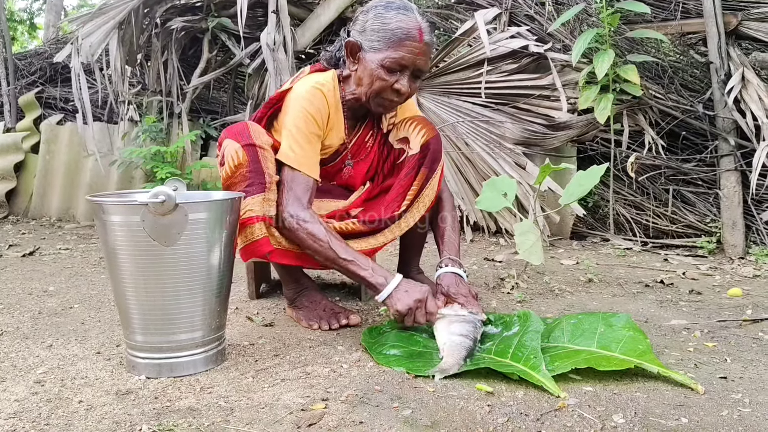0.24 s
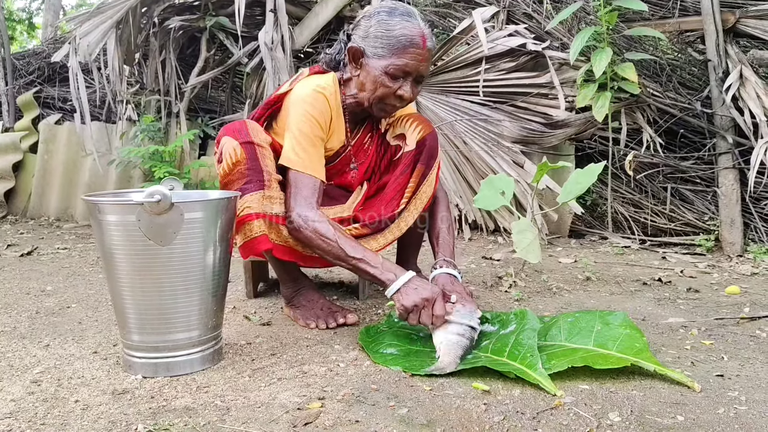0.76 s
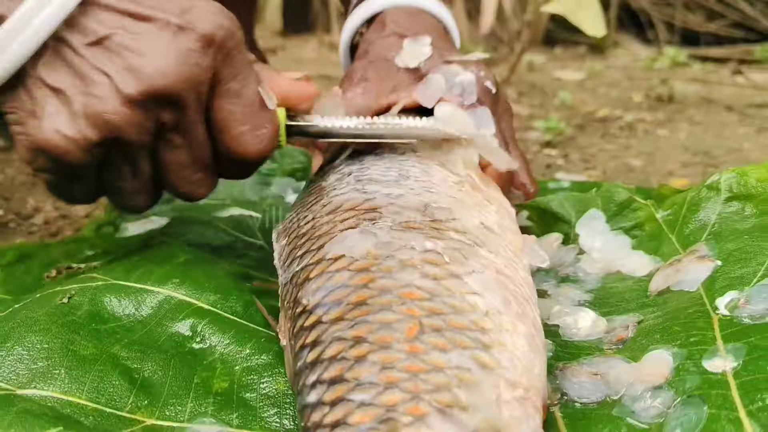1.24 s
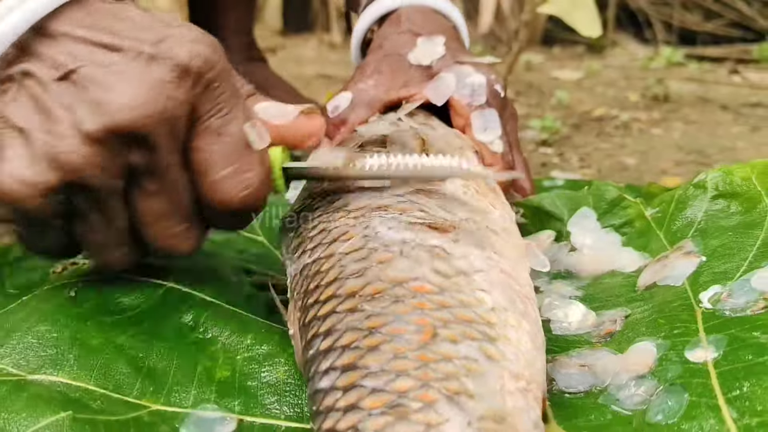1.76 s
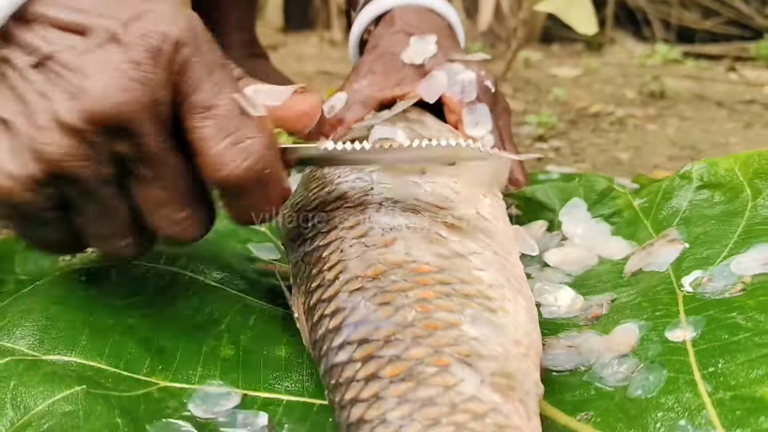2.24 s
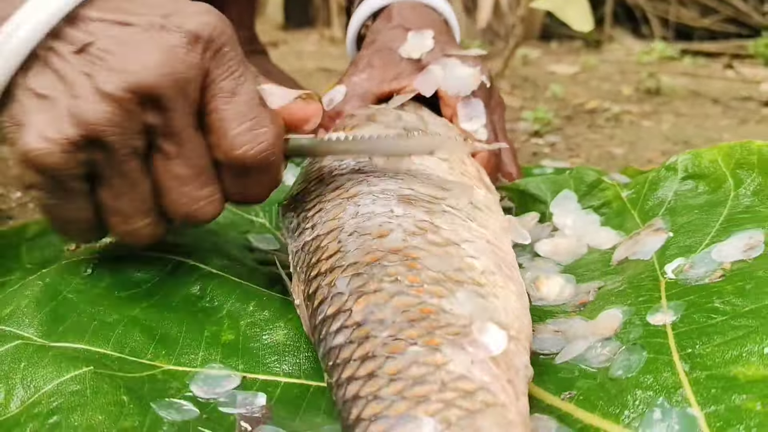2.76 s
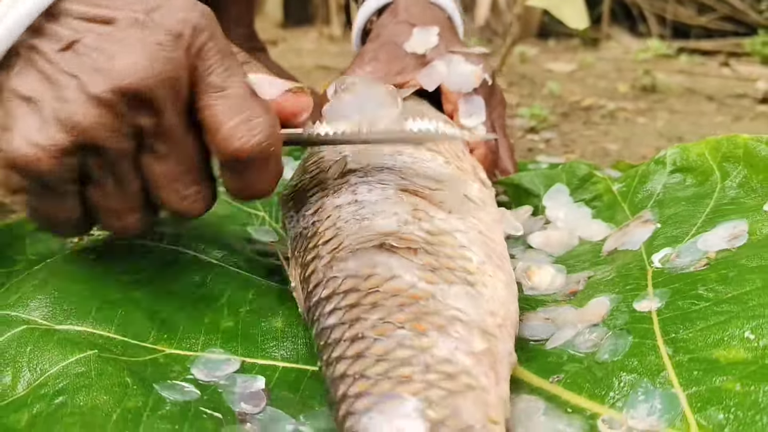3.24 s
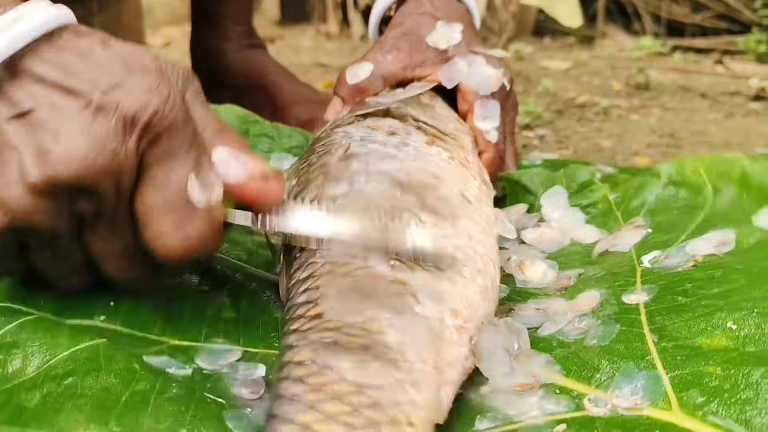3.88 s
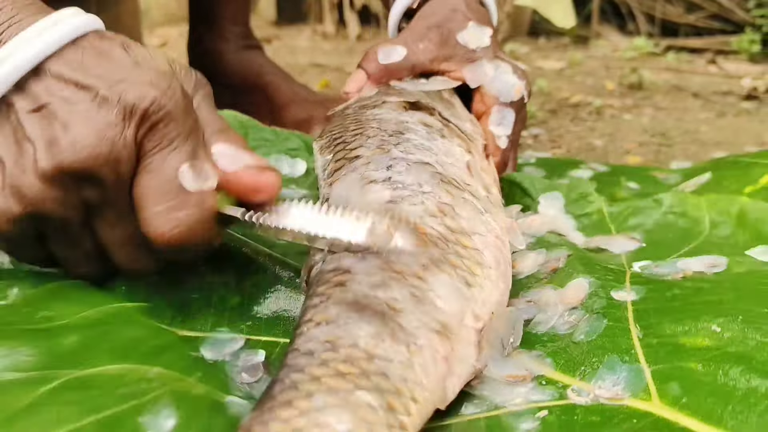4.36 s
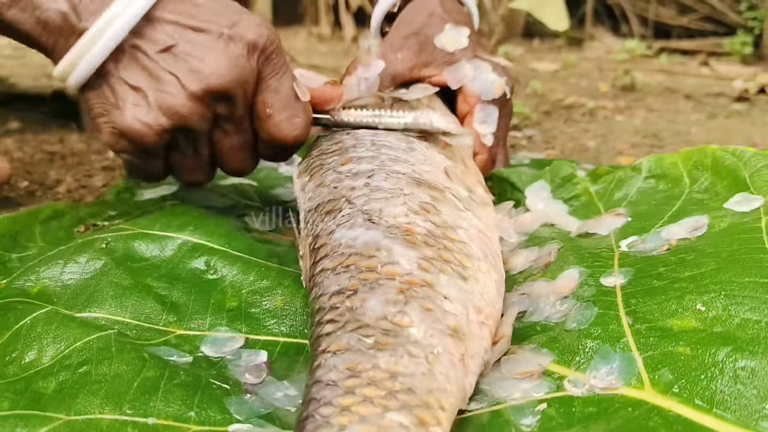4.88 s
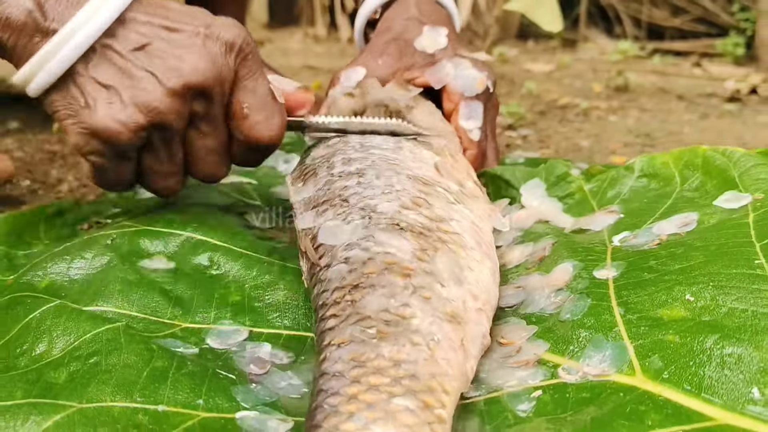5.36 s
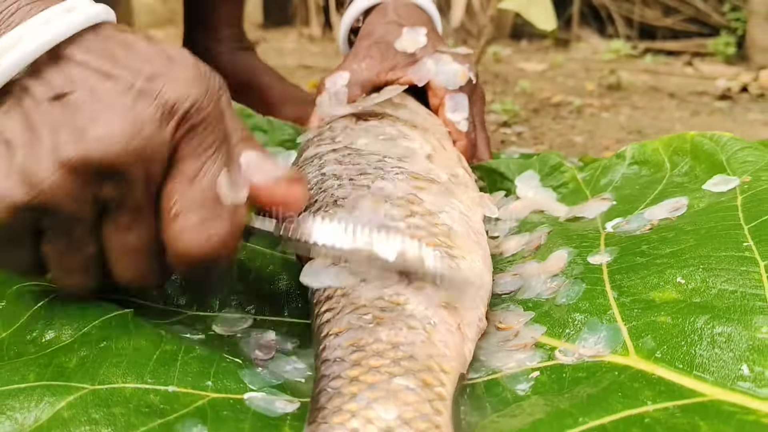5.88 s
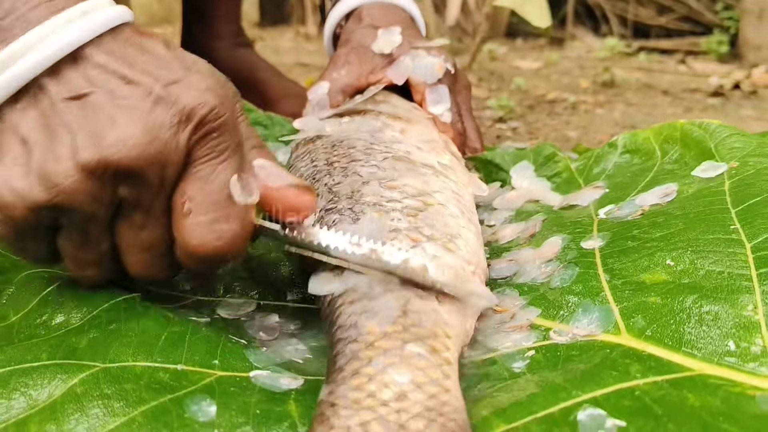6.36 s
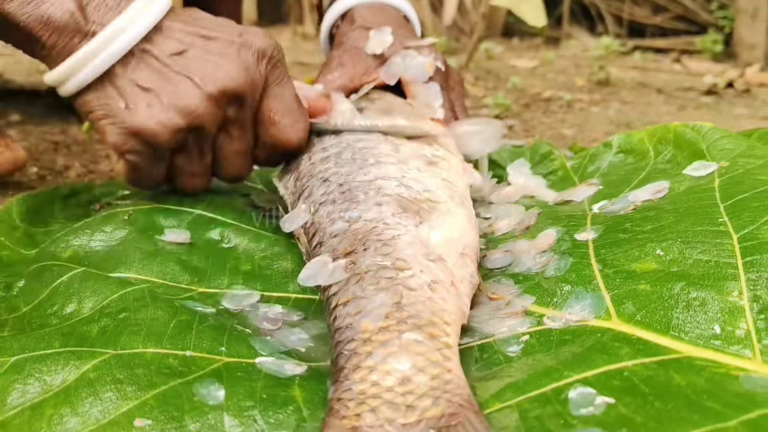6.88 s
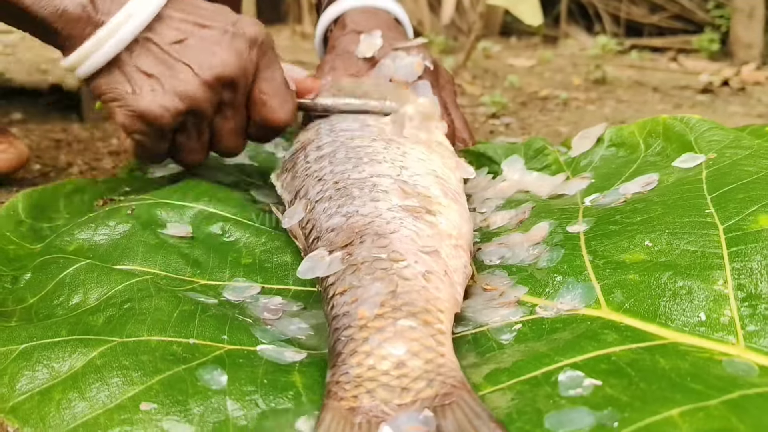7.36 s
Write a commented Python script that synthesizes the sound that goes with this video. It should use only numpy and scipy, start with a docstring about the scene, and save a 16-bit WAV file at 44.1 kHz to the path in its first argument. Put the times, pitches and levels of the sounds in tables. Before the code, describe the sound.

A serrated blade scrapes scales off a raw fish in quick raspy strokes, softer at first, then loud, crisp and close after a brief dropout.

```python
"""A yard: a serrated knife scrapes the scales off a raw fish on big leaves, first a few steps away, then,
after a cut with a short silence, close by. Strokes drive five bands of noise under many small catches of the teeth;
scales snap loose as sharp bursts, and dull taps are clusters of damped rings. A far hen calls faintly as a wavering
tone over steady coloured yard noise. Two microphone ports colour the scraping differently; the left hears it later.
"""
import sys
import numpy as np
from scipy import signal
from scipy.fft import rfft, irfft, next_fast_len
from scipy.io import wavfile
from scipy.ndimage import uniform_filter1d, map_coordinates

SR = 44100
rng = np.random.default_rng(int(sys.argv[2]) if len(sys.argv) > 2 else 0)


def digitize_waveform(pressure):
    """Quantize a signal to 16-bit integers and store it at the path in sys.argv[1].

    Rows of a 2-D input are taken as channels; values are limited to [-1, 1].
    """
    field = np.atleast_2d(pressure).T
    bounded = np.clip(field, -1, 1)
    quanta = np.round(bounded * 32767).astype(np.int16)
    wavfile.write(sys.argv[1], SR, quanta)


N = 336483

# the sound drops out briefly at the cut from the distant scraping to the close one
SILENCE_START_S, SILENCE_END_S = 1.322, 1.411


def amp(db):
    """dB to gain."""
    return 10 ** (np.asarray(db) / 20)


def along(points, hz):
    """Reads the columns of (Hz, value, ..) rows along a log frequency axis."""
    f, *cols = np.transpose(points)
    return np.array([np.interp(np.log(hz + 1), np.log(f + 1), c) for c in cols])


def curves(rows):
    """One value per sample for each column after the time."""
    s, *cols = np.transpose(rows)
    return [np.interp(np.arange(N) / SR, s, c) for c in cols]


def wobble(rate):
    """A smooth random curve, rate knots a second."""
    knots = rng.standard_normal(int(N * rate / SR) + 4)
    return map_coordinates(knots, [np.arange(N) * rate / SR])


def filtered(x, response):
    """Filters x by a response given as a function of frequency."""
    m = next_fast_len(N + 8192)
    hz = np.fft.rfftfreq(m, 1 / SR)
    return irfft(rfft(x, m) * response(hz), m)[..., :N]


def causal(gain):
    """Minimum-phase response with the given gains, made by folding the cepstrum."""
    cepstrum = irfft(np.log(gain + 1e-6))
    half = cepstrum.shape[-1] // 2
    cepstrum[..., 1:half] *= 2
    cepstrum[..., half + 1:] = 0
    return np.exp(rfft(cepstrum))


def band(hz, low, high):
    """Gain of a steep band-pass."""
    return 1 / np.sqrt((1 + (low / (hz + 1)) ** 12) * (1 + (hz / high) ** 12))


def add(track, s, sound):
    """Mixes a short sound into the track at time s."""
    start = round(s * SR)
    part = track[..., start:start + sound.shape[-1]]
    part += sound[..., :part.shape[-1]]


def strokes():
    """Band gains and blade side: a stroke is 20 dB down one rise before and one fall after its top."""
    # strokes, bites and brushes of the blade: top_s (most pressure), rise_s, fall_s, crackle_db,
    # hiss, rasp, grind and thud re crackle (dB), pan_db (crackle left-right, before knife() scales it)
    stroke_rows = [(-0.005, 0.07, 0.068, -71, 1, 1, -24, -9, 1),
                   (0.323, 0.097, 0.11, -40.5, -9.5, -9.5, -16.5, -11, -2.5),
                   (0.517, 0.023, 0.041, -56, -9, -22, -35, -19, -2.0),
                   (0.67, 0.043, 0.088, -36.5, -8.0, -9, -19, -15, -4),
                   (0.907, 0.053, 0.0097, -61.5, -5, -19.0, -29.0, -13, -14),
                   (1.025, 0.06, 0.14, -51, -1.5, -1.5, -13.5, -12.5, -4.5),
                   (1.225, 0.041, 0.096, -57.5, -12.5, -15.5, -32, -18, -1.5),
                   (1.458, 0.065, 0.081, -60.5, -1, 1, -2, -32.0, -11),
                   (1.591, 0.011, 0.085, -47, -16, -1, -5.5, -16.5, -4),
                   (1.718, 0.066, 0.13, -32.5, -7.5, -12, -18, -22, -9),
                   (1.724, 0.044, 0.013, -29.5, -17, -3.5, -9, -7.5, -8.5),
                   (1.903, 0.032, 0.13, -63, -10.5, -31.0, -31.0, -38.5, -5.5),
                   (2.102, 0.0069, 0.019, -47.0, -19, 3.5, 2.5, -30.0, -8),
                   (2.158, 0.078, 0.078, -40.5, -5, 1, -13, -15.5, -8),
                   (2.228, 0.017, 0.049, -25.5, -7.0, -27, -28, -23, -4),
                   (2.319, 0.16, 0.011, -37, -2.5, -8.5, -8, -12, -11.5),
                   (2.357, 0.049, 0.068, -54.5, -3.5, -6.5, -12, -13, -4),
                   (2.73, 0.1, 0.11, -30.5, -2.5, -3.5, -11.5, -17.5, -7.5),
                   (2.901, 0.035, 0.0245, -50.5, -6, -30.5, -31, -30, -10.0),
                   (3.213, 0.097, 0.065, -28, -4.5, -7, -11.5, -18.5, -8.5),
                   (3.359, 0.065, 0.055, -60, 1, -6, -11, -14.0, -5),
                   (3.672, 0.06, 0.091, -35.5, -7, -0.5, -8.5, -12, -5),
                   (3.799, 0.14, 0.092, -38.5, -7, -5.5, -9.5, -25, -6.5),
                   (4.071, 0.069, 0.12, -27.5, -5, -7.5, -14, -17.5, -5.5),
                   (4.306, 0.081, 0.031, -41.5, -6, 2, -1, -17, -17.5),
                   (4.444, 0.025, 0.15, -58, -12, -6, -7.5, -6.5, -3),
                   (4.565, 0.076, 0.1, -25.0, -4, -6.0, -12.0, -17, -9),
                   (4.719, 0.0078, 0.15, -63, -20, -32.0, -35, -15, -5),
                   (4.872, 0.018, 0.14, -52, -12.0, -13.5, -25.0, -32.0, -10),
                   (4.97, 0.054, 0.099, -29, -6, -18.5, -15.5, -19.5, -8.5),
                   (5.142, 0.055, 0.035, -52.5, -7, -21, -27, -23, -8),
                   (5.421, 0.11, 0.1, -30.5, -5.5, -12, -17.0, -19.5, -9.5),
                   (5.578, 0.022, 0.025, -51.0, -7, -16, -19, -15, -11),
                   (5.701, 0.02, 0.097, -47.5, -19, -15, -24, -38, -7),
                   (5.849, 0.11, 0.056, -35, -6.5, -13.5, -18, -17, -8.5),
                   (5.905, 0.033, 0.136, -49, -14, -18, -33, -16, -10),
                   (6.065, 0.035, 0.1, -43, -17.5, -13.5, -32, -22.0, -7.0),
                   (6.168, 0.021, 0.019, -70, -5, 16, -2, -5, -8.0),
                   (6.242, 0.065, 0.075, -32.5, -12.0, -17.5, -22.5, -16, -13.5),
                   (6.469, 0.1, 0.048, -40, -19, -15.5, -29, -29, -9),
                   (6.59, 0.055, 0.082, -44.5, -18, -11, -19, -16, -7),
                   (6.632, 0.027, 0.12, -32, -12, -15.5, -23, -22.0, -9.5),
                   (6.825, 0.01, 0.054, -52.5, -30, -26, -29, -22, -11),
                   (6.992, 0.015, 0.018, -40, -5, 9, -21, -21.0, -8.0),
                   (7.058, 0.1, 0.094, -34.5, -7.5, -10.0, -17, -13.5, -7.5),
                   (7.278, 0.12, 0.24, -52.5, -18.5, -14.5, -22, -16, -12),
                   (7.4, 0.015, 0.026, -45.5, -8, 3.5, -9, -10, -8),
                   (7.532, 0.153, 0.052, -35, -9.0, -13, -15, -16.5, -9.5),
                   (7.641, 0.077, 0.05, -56.5, -4.0, -13.0, -22, -9, -12)]
    # hand and leaves stirring between strokes: crackle_db, hiss_db, rasp_db, grind_db, thud_db
    rest_db = (-80.5, -88.5, -75, -80, -75)
    # delay after the top: crackle_s, hiss_s, rasp_s (early), grind_s and thud_s (late, as the flesh gives way)
    lag_s = (0, 0.00075, -0.0035, 0.0026, 0.013)
    roundness = 2.51  # power of the fall-off to either side of a top: 1 pointed, 4 flat-topped
    s, rise, fall, crackle_db, *re_db, pan_db = np.transpose(stroke_rows)[..., None]
    t = np.arange(0, N, 64) / SR

    def swell(u):
        return amp(-20 * np.where(u < 0, -u / rise, u / fall) ** roundness)

    tops = amp(crackle_db + np.array([0 * s, *re_db]))
    power = (tops * [swell(t - s - lag) for lag in lag_s]) ** 2
    power = power + amp(rest_db)[:, None, None] ** 2 / len(s)  # the stir is shared out among the strokes
    # the strongest crackle of the moment weighs most on the side
    pan_db = np.sum(power[0] * pan_db, axis=0) / np.sum(power[0], axis=0)
    gains = np.sqrt(np.sum(power, axis=1))
    return [np.interp(np.arange(N) / SR, t, c) for c in (*gains, pan_db)]


def grit(rate, spread_db, life, smooth, flutter_db):
    """Pressure of the teeth, rms 1: a fluttering slide under many short catches of uneven size."""
    size_db = spread_db * np.minimum(rng.exponential(size=N), 2.5)  # capped: the big ones are the snaps
    catches = (rng.random(N) < rate / SR) * amp(size_db)
    catches = signal.lfilter([1], [1, -np.exp(-1 / (life * SR))], catches)
    catches = uniform_filter1d(catches, size=24)  # a catch builds up before it slips
    pressure = (smooth + catches) * amp(flutter_db * wobble(45))
    return pressure / np.sqrt(np.mean(pressure ** 2))


def patchy(depth_db, size):
    """Three noises, rms 1, whose colour shifts together; larger size: narrower, longer-lived patches."""
    z = signal.stft(rng.standard_normal((3, N)), nperseg=size)[2]
    field = rng.standard_normal(z.shape[1:])
    field = uniform_filter1d(field, size=3, axis=0)  # along frequency
    field = uniform_filter1d(field, size=4, axis=1)  # along time
    noise = signal.istft(z * amp(depth_db * field / field.std()), nperseg=size)[1][:, :N]
    return noise / noise.std()


def ports(force, colour, low, high):
    """One band of the force at both ports; rows of force: common part, left's own, right's own."""
    # likeness of the scraping at both ports: pitch_hz, common_share (0-1, of power)
    alike = [(100, 0.83), (400, .4), (700, 0.52), (1150, 0.8), (1700, 0.81), (2600, 0.38), (6000, 0.13),
             (12000, 0.17)]
    m = next_fast_len(force.shape[1] + 8192)
    hz = np.fft.rfftfreq(m, 1 / SR)
    response = causal(amp(along(colour, hz)) * band(hz, low, high))
    share = np.clip(along(alike, hz)[0], 0, 1)
    parts = rfft(force, m)
    heard = (np.sqrt(share) * parts[0] + np.sqrt(1 - share) * parts[1:]) * response
    # the colour tilts the band and the left-right balance, not its overall level
    return irfft(heard, m)[:, :force.shape[1]] / np.sqrt(np.mean(np.abs(response) ** 2))


def snaps(force):
    """Adds to force the scales that bend, crack loose or land: noise with a sharp core and a skirt."""
    # scales snapping loose or landing: crack_s, crackle_db, hiss re crackle (dB), rasp re crackle (dB)
    snap_rows = [(0.233, -49, -30, 3.5), (0.266, -31.5, -10, -7), (0.29, -30, -8.5, -5),
                 (0.337, -41, 4, -2), (0.377, -25.5, -13, -8.5), (0.562, -47, -23, -15),
                 (0.62, -43.5, -9, -25), (0.64, -26, -1.5, -14), (0.747, -40.5, -17, -5),
                 (0.988, -52, 5, -21), (1.029, -32.5, -6, -28), (1.1, -37, -10, -16),
                 (1.276, -51.5, -18, -22), (1.312, -49, -10.5, -16), (1.439, -48, -25, -21),
                 (1.459, -44.5, -20, -15), (1.728, -14, -33, -10), (1.773, -13, -9.5, -12),
                 (1.825, -36, -4, -19), (1.837, -26, -37, -27), (2.111, -30, -27, -23),
                 (2.149, -11.5, -14, -34), (2.228, -16, -7.5, -40), (2.319, -18.5, -36, -6.5),
                 (2.354, -34.5, 1, -31), (2.452, -41.5, -29, -14.5), (2.682, -21, -23, -38),
                 (2.687, -18, -30, -33), (2.711, -7, -12, -42), (2.734, -9.5, -20, -29),
                 (2.747, -12.5, -6, -23), (3.045, -52, 8.5, 23.5), (3.089, -39, -34, -36),
                 (3.114, -38, -16, -23), (3.166, -16.5, -11, -28), (3.286, -49.5, 12.5, 5),
                 (3.349, -52.5, 16, 2), (3.642, -20, -12, -26), (3.658, -9, -19.5, -34),
                 (3.702, -8.5, -13.5, -20.5), (3.709, -19, -19, -24), (4.138, -13.5, -11, -5.5),
                 (4.168, -27.5, -30, -30), (4.191, -31, -31, -32), (4.252, -37, -21.5, -15),
                 (4.432, -41.5, -13, -10.5), (4.515, -35, 8, -17), (4.578, -21, -5, -13),
                 (4.609, -17.5, -11, -19), (4.624, -16, -2.5, -33), (4.727, -34, -32, -29),
                 (4.774, -48, -12, -4), (4.862, -39.5, -35, -29), (4.928, -42, -22, -33),
                 (4.955, -14.5, -13, -10), (4.996, -10.5, -18, -46), (5.027, -21.5, 0, -37),
                 (5.048, -21.5, -11, -20.5), (5.09, -37, -23, -26), (5.146, -39.5, -13, -31),
                 (5.276, -43, -18, -28), (5.35, -23.5, -15, -19), (5.375, -22.5, -6, -18.5),
                 (5.407, -17.5, -6, -24), (5.417, -20.5, -11, -28), (5.505, -28, -18, -17),
                 (5.576, -40.5, -5, -14), (5.701, -36.5, -10, -31), (5.841, -24.5, -8.5, -32),
                 (5.856, -26.5, -21, -10), (5.868, -27, -21, -28), (5.929, -23, -23, -45),
                 (5.969, -42, -25, -35), (5.987, -38.5, -31, -25), (6.083, -26.5, -20, -44),
                 (6.107, -28, -30, -36), (6.141, -35, -36, -34), (6.2, -24.5, -15, -18),
                 (6.246, -24, -32, -38), (6.446, -28, -30, -36), (6.455, -27, -36, -40),
                 (6.467, -39, -26.5, -15), (6.548, -47, -29, -21), (6.585, -32.5, -22, -29),
                 (6.617, -29, -30, -24), (6.629, -17, -29, -18), (6.713, -24, -30, -28),
                 (6.811, -48, -18, -26), (6.962, -38, -23, -12), (7.016, -20.5, -11.5, -13),
                 (7.064, -19.5, -21, -16), (7.123, -29, -24, -28), (7.23, -39.5, -30, -29),
                 (7.318, -30.5, -43, -36), (7.408, -45, -4, 5), (7.447, -30, -7, -26.5),
                 (7.458, -20, -19, -18), (7.468, -19, -21, -26), (7.559, -28.5, -6, -6)]
    # decay of a snap's skirt by 60 dB: crackle_s, hiss_s, rasp_s, grind_s
    skirt_t60 = (0.011, 0.022, 0.0084, 0.015)
    level_s = 0.0015  # a snap's level is its rms as if all its energy fell in this time
    grind_re_rasp_db = -7.5
    core_db, core_t60_s = 5.5, 0.0011  # the sharp core, over its skirt
    t = np.arange(-SR // 100, SR // 50) / SR
    t60 = np.reshape(skirt_t60, (-1, 1, 1))
    shape = amp(-60 * np.where(t > 0, t, -1.3 * t) / t60)  # the scale creaks as it bends, then lets go
    shape = shape + amp(core_db - 60 * np.abs(t) / core_t60_s)
    for s, db, hiss_re_db, rasp_re_db in snap_rows:
        burst = rng.standard_normal((3, len(t))) * shape
        burst *= np.sqrt(level_s * SR) / np.linalg.norm(burst, axis=2, keepdims=True)
        band_db = db + np.array([0, hiss_re_db, rasp_re_db, rasp_re_db + grind_re_rasp_db])
        add(force[:-1], s + t[0], burst * amp(band_db)[:, None, None])  # all bands but the thud


def knife():
    """Slide, catches and snaps shake skin and scales; each band of that force has its own strength."""
    # bands of the scraping, in order crackle, hiss, rasp, grind, thud: low_hz, high_hz
    bands = [(6500, 20000), (3000, 6500), (1400, 3000), (600, 1400), (70, 600)]
    # colour of the scraping at each port, a few steps away: pitch_hz, left_db, right_db
    far_colour = [(60.9, -33, -10), (150, -11, -5), (352, -17, -9), (815, -7, -18.5), (1597, -11.5, -7.5),
                  (2320, -3.5, -7.5), (3930, -9.5, -5), (5120, -5.5, -20.5), (6200, -8.5, -13),
                  (7060, -38, -9.5), (8130, -2.5, 4), (11900, -1.5, -7.5), (12950, -10, -9),
                  (15450, -8.5, -10.5)]
    # the same, close by: pitch_hz, left_db, right_db
    near_colour = [(60, -26.5, -20), (145, -16, -10.5), (324, -24.5, -19.5), (820, -16, -10),
                   (1730, -13.5, -17), (2960, -17, -12.5), (3900, -11, -8.5), (4750, -4, -17),
                   (6550, -9.5, -9.5), (7130, -20.5, -9), (7950, -4, 2.5), (11600, -7, 0.5),
                   (13200, -25, -11.5), (15200, -20, -5)]
    *gains, pan_db = strokes()
    teeth = grit(rate=290, spread_db=4.0, life=0.0006, smooth=0.82, flutter_db=1.5)
    drag = grit(rate=180, spread_db=6.5, life=0.0018, smooth=3.6, flutter_db=1.0)
    pressure = np.array([teeth, np.sqrt(teeth * drag), drag, drag, drag ** 1.5])
    pressure *= gains
    # each scale, each fold of skin rings in its own range
    scales = patchy(depth_db=4.0, size=192)
    skin = patchy(depth_db=5.0, size=768)
    force = pressure[:, None] * [scales, scales, skin, skin, scales]
    snaps(force)
    cut = round((SILENCE_START_S + SILENCE_END_S) / 2 * SR)
    heard = []
    for f, (low, high) in zip(force, bands):
        far = ports(f[:, :cut], far_colour, low, high)
        near = ports(f[:, cut:], near_colour, low, high)
        heard.append(np.hstack([far, near]))
    # the hand shades one port as the blade travels; only the crackle is turned
    close = np.arange(N) >= cut
    turn_db = pan_db - np.where(close, -7, -2.5)
    return heard[0] * amp([turn_db * 0.51, -turn_db * 0.39]) + sum(heard[1:])


def ground(x):
    """Nearby echoes as decaying noise: each frequency dies at its own speed."""
    # answer from ground and fence: pitch_hz, t60_s
    decay = [(300, 0.019), (3000, 0.046), (12000, 0.014)]
    hz, t, z = signal.stft(rng.standard_normal((2, SR // 5)), SR, nperseg=128)
    fade = amp(-60 * t / along(decay, hz)[0][:, None])
    tail = signal.istft(z * fade, SR, nperseg=128)[1]
    late = np.pad(x, ((0, 0), (90, 0)))  # the echo sets in after 2 ms
    return signal.fftconvolve(late, tail / np.linalg.norm(tail[0]), axes=1)[:, :N]


def yard():
    """Steady outdoor noise, unrelated at the two ports, swelling a little."""
    # air, rustle and insects, before the swelling: pitch_hz, left_db and right_db (per Hz)
    spectrum = [(29.8, -117.5, -86.5), (100, -114.5, -83.5), (200, -113.5, -86.5), (370, -113.5, -98.5),
                (900, -112.5, -110.5), (2500, -119.5, -116.5), (4500, -111.5, -120.5),
                (5800, -119.5, -120.5), (7200, -125.5, -119.5), (8400, -114.5, -108.5),
                (9200, -115.5, -112.5), (12000, -119.5, -117.5), (15200, -131.5, -120.5)]
    noise = filtered(rng.standard_normal((2, N)), lambda hz: amp(along(spectrum, hz)) * np.sqrt(SR / 2))
    return noise * amp(1.4 * np.array([wobble(6.1), wobble(5.6)]))


def taps():
    """Each tap is a cluster of damped rings around its centre, with a soft start."""
    # dull taps of blade or scale on flesh and leaf: start_s, peak_db (without echo), centre_hz, t60_s
    tap_rows = [(0.264, -43, 970, 0.037), (0.337, -34.5, 984, 0.051), (0.372, -40, 505, 0.091),
                (0.681, -30, 2220, 0.023), (0.683, -35.5, 900, 0.04), (1.042, -36.5, 806, 0.027),
                (1.041, -31, 1930, 0.029), (1.638, -46, 200, 0.024), (1.726, -12.5, 817, 0.015),
                (1.963, -46.5, 2160, 0.02), (2.227, -25, 840, 0.02), (2.303, -27.5, 1893, 0.034),
                (2.569, -44.5, 1880, 0.014), (3.043, -25, 2230, 0.017), (3.432, -47.5, 914, 0.086),
                (3.743, -25, 1734, 0.034), (4.318, -27, 1170, 0.025), (4.431, -50.5, 257, 0.063),
                (5.576, -32.5, 1346, 0.014), (5.761, -34, 1940, .03), (6.044, -44, 780, 0.021),
                (6.144, -48, 2000, .02), (7.06, -38.5, 253, 0.051), (7.236, -48, 1400, 0.011),
                (7.26, -47.5, 970, 0.03), (7.529, -34, 572, 0.058)]
    out = np.zeros(N)
    t = np.arange(SR // 8) / SR
    for s, db, hz, t60 in tap_rows:
        # nine rings spread in log pitch, weaker away from the centre
        detune = 0.303 * np.linspace(-1, 1, num=9)[:, None] + rng.normal(0, 0.06, (9, 1))
        phase = rng.random((9, 1))
        rings = np.sin(2 * np.pi * (hz * np.exp(detune) * t + phase))
        ring = np.sum(amp(-25 * detune ** 2) * rings, axis=0)
        ring *= amp(-60 * t / t60) * (1 - np.exp(-t / 0.002))
        add(out, s, ring / np.max(np.abs(ring)) * amp(db))
    return out


def shove():
    """The fish jolts: a low push and rebound through the ground moves the ports in opposite senses."""
    start_s, drive_db, length_s = 1.727, -19, 0.004
    u = np.maximum(np.arange(N) / SR - start_s, 0) / length_s
    push = u * (1 - u / 3) * np.exp(1 - u)
    return amp(drive_db) * push * [[-0.2], [1]]  # left, right


def hen():
    """A thin drawn-out note with a weak overtone, wavering in pitch and level."""
    # the note before it wavers: time_s, pitch_hz, level_db (of the fundamental)
    note = [(4.3, 797, -99), (4.34, 810, -82), (4.4, 860, -73), (4.46, 850, -69), (4.5, 796, -97)]
    hz, db = curves(note)
    phase = 2 * np.pi * np.cumsum(hz * (1 + 0.01 * wobble(32))) / SR
    tone = np.sin(phase) + 0.3 * np.sin(2 * phase)
    return amp(db + 2.8 * wobble(30)) * tone


def scene():
    """Knife and taps with their echoes, in the yard; the left port is farther from the fish."""
    # how much later the left port hears the knife: time_s, lag_s
    left_lag = [(0, 0.000059), (1.36, 0.00012), (1.37, .0005), (5.3, 0.000507), (5.6, .00027),
                (7.63, 0.00029)]
    left, right = knife() + taps()
    left = map_coordinates(left, [np.arange(N) - curves(left_lag)[0] * SR], order=5)
    work = np.array([left, right])
    echo = amp(-12) * ground(work)
    return work + echo + shove() + hen() + yard()


def record(dry):
    """The highest peaks are rounded, the sound drops out once, and the top treble is cut off steeply."""
    fall_hz, top_hz = 15400, 16800  # treble falls steeply at fall_hz and ends at top_hz
    gate_s = [SILENCE_START_S - 0.002, SILENCE_START_S, SILENCE_START_S + 0.014,
              SILENCE_END_S - 0.017, SILENCE_END_S, SILENCE_END_S + 0.0017]
    gate_db = np.interp(np.arange(N) / SR, gate_s, [0.0, -26, -47, -39, -20, -1])  # stays at -1 dB after
    rounded = dry / (1 + np.abs(dry / 0.86) ** 6) ** (1 / 6)
    kept = rounded * amp(gate_db) * (gate_db > -44.9)  # fully mute at the deepest part

    def treble(hz):
        return (hz < top_hz) * np.maximum(1 / (1 + (hz / fall_hz) ** 160), amp(-44))

    return filtered(kept, treble)


dry = scene()
out = record(dry)
digitize_waveform(out)
```